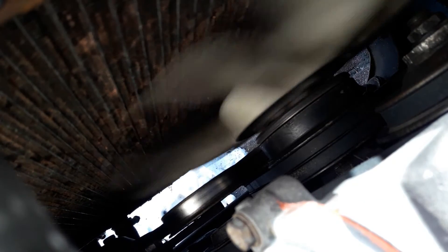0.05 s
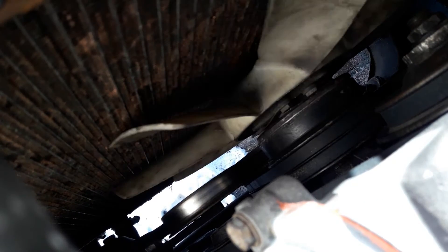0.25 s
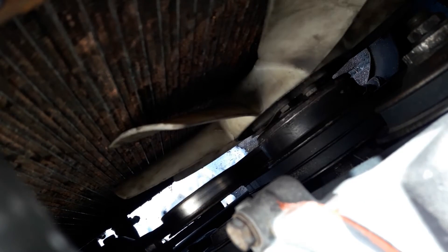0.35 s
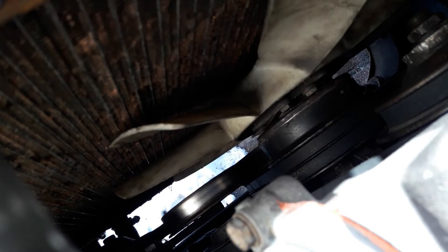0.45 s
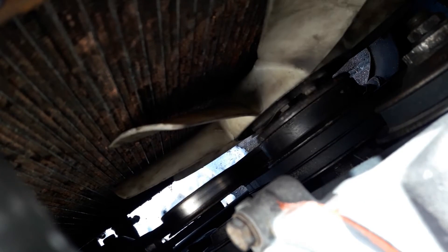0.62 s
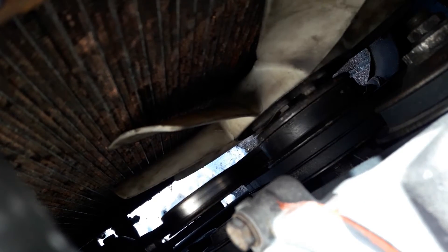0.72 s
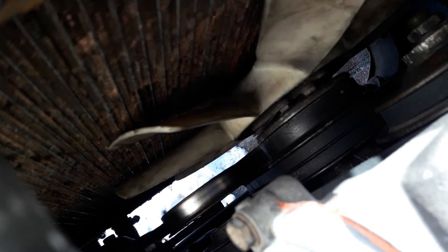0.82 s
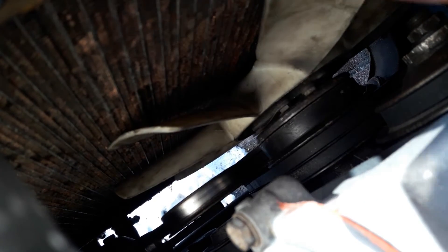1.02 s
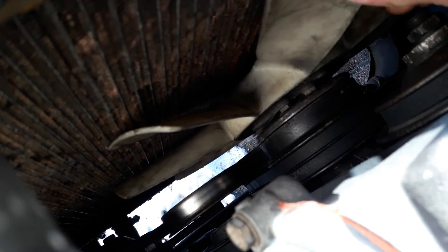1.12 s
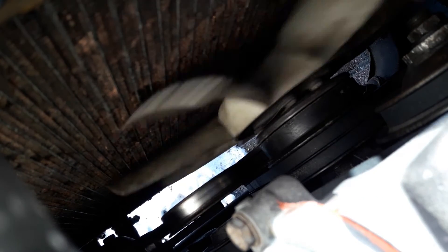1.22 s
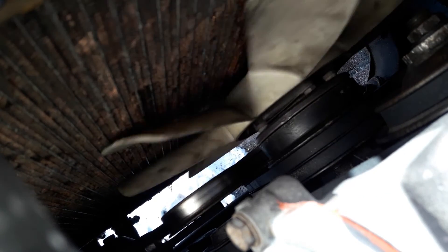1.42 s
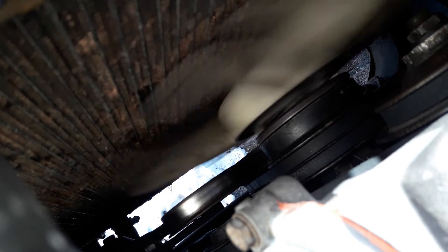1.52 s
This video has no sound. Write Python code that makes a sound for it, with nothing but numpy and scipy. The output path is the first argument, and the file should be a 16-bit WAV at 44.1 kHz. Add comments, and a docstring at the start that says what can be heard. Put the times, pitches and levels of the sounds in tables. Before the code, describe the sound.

Close in a quiet engine bay, faint rubbing ends in one sharp metallic clack as a fan clutch grips. A lighter click and tiny tick follow, then the fan spins up with a soft hiss and slight scrapes.

```python
"""An electromagnetic fan clutch, close up in a quiet engine bay.
The fan coasts with a faint rubbing tone, and the armature plate brushes the pulley.
At 0.22 s the plate snaps on with a sharp metal clack, and the stopped blades shudder.
At 0.6 s it lets go with a small bright click, then settles with a tick.
The fan turns again with a faint hiss, a soft rush and three light scrapes."""
import sys
import numpy as np
from scipy import signal
from scipy.fft import rfft, irfft
from scipy.io import wavfile

SR = 44100
rng = np.random.default_rng(int(sys.argv[2]) if len(sys.argv) > 2 else 0)


def generate_wav(sig):
    """Save sig (samples, or channels by samples) to the path in sys.argv[1] as 16-bit PCM at SR."""
    pcm = np.round(np.clip(np.atleast_2d(sig).T, -1, 1) * 32767).astype(np.int16)
    wavfile.write(sys.argv[1], SR, pcm)


N = 68355
TIME = np.arange(N) / SR
FREQS = np.maximum(np.fft.rfftfreq(N, 1 / SR), 1)
ENGAGE_S, RELEASE_S, SETTLE_S = .2156, .5996, .6583


def from_db(db):
    """Decibels to gain."""
    return 10 ** (np.asarray(db) / 20)

def at_hz(points, hz, column=1):
    """Read a column of a table on a log-frequency axis."""
    table = np.array(points)
    return np.interp(np.log(hz), np.log(table[:, 0]), table[:, column])

def noise_bins(spectrum):
    """Random-phase spectrum with the given density."""
    magnitude = from_db(at_hz(spectrum, FREQS)) * np.sqrt(N * SR / 2)
    return magnitude * np.exp(2j * np.pi * rng.random(len(FREQS)))

def noise(spectrum):
    """Steady noise with the given colour."""
    return irfft(noise_bins(spectrum), N)

def swell(centre_s, width_s):
    """A bell-shaped fade in and out."""
    return np.exp(-.5 * ((TIME - centre_s) / width_s) ** 2)

def drift(rate_hz):
    """Smooth random modulation with spread 1."""
    size = 2048
    lowpass = 1 / (1 + (np.fft.rfftfreq(size, TIME[-1] / size) / rate_hz) ** 4)
    slow = irfft(rfft(rng.standard_normal(size)) * lowpass)
    return np.interp(TIME, np.linspace(0, TIME[-1], size), slow / slow.std())

def blow(start, attack, t60):
    """Impact envelope: rounded attack, exponential decay."""
    out = np.zeros(N)
    live = (TIME > start) & (TIME < start + 2 * t60)
    age = TIME[live] - start
    out[live] = np.sin(np.pi / 2 * np.minimum(age / attack, 1)) ** 2 * from_db(-60 * age / t60)
    return out

def dense_ring(start, spectrum, ring):
    """Crowded metal modes: each third octave swells and dies at its own rate, then lingers in the bay."""
    bins, out = noise_bins(spectrum), np.zeros(N)
    edges = np.geomspace(140, 18000, 22)
    bay_reverb = blow(start, attack=.012, t60=.21)
    for low, high in zip(edges, edges[1:]):
        hz = np.sqrt(low * high)
        attack, t60, reverb_db = (at_hz(ring, hz, column) for column in (1, 2, 3))
        band = irfft(bins * (FREQS >= low) * (FREQS < high), N)
        envelope = np.hypot(blow(start, attack, t60), from_db(reverb_db) * bay_reverb)
        hit = band * envelope
        # hold the band's energy steady however the noise falls
        out += hit * band.std() * np.sqrt(np.sum(envelope ** 2) / np.sum(hit ** 2))
    return out

def clear_ring(start, modes):
    """Distinct metal modes, each beating unevenly against close neighbours."""
    out = np.zeros(N)
    for hz, db, t60 in modes:
        tone = np.sin(2 * np.pi * (hz * TIME + rng.random()))
        beating = 1 + .25 * drift(rate_hz=70)
        attack = min(11 / hz, .009)   # the blow spreads through the metal in 11 cycles, 9 ms at most
        out += from_db(db) * blow(start, attack, t60) * tone * beating
    return out


# dark background bed: f/Hz, level/dB per Hz
BED = [(20, -115), (40, -103), (60, -92.5), (110, -92.5), (200, -101), (400, -107), (1000, -109),
       (2000, -113), (4000, -117), (8000, -121), (15500, -124)]
def engine_bay():
    """Low, steady ambience under the whole scene."""
    return noise(BED)

# low hum with a thin tone near 1.5 kHz: f/Hz, level/dB per Hz
RUB = [(40, -105), (80, -91), (122, -77), (190, -86), (270, -88), (400, -103), (1000, -104), (1400, -100),
       (1470, -87), (1515, -80), (1570, -83), (1620, -92), (1720, -102), (1920, -97), (2300, -110),
       (4200, -117), (6500, -123), (10000, -120), (15000, -135)]
def plate_rub():
    """The plate rubs while the fan coasts, fading in 20 ms once the clutch grips."""
    coasting = np.clip((ENGAGE_S - TIME) / .02 + 1, 0, 1)
    return coasting * noise(RUB)

# airy whisper: f/Hz, level/dB per Hz
BRUSH = [(2000, -125), (3400, -113), (4200, -108), (5200, -113), (6500, -126), (12000, -140)]
def plate_brush():
    """The plate brushes the pulley just before it grips."""
    return swell(centre_s=.128, width_s=.032) * noise(BRUSH)

# the clack's body of crowded modes: f/Hz, level/dB per Hz
CLACK_BODY = [(150, -74), (280, -69), (400, -78), (520, -64), (800, -61), (1050, -62), (1550, -56),
              (2100, -56), (2370, -64), (2700, -52.5), (3250, -56), (3650, -60), (3950, -55), (4280, -60),
              (4500, -49.5), (6600, -52), (7100, -63), (8400, -53.5), (9050, -67), (9500, -47.5),
              (10500, -50.5), (11000, -62.5), (12700, -60), (13800, -69), (15700, -68)]
# its envelope: f/Hz, attack/s, t60/s, reverb/dB
CLACK_ENVELOPE = [(300, 0.0046, .22, -18), (694, 0.0062, .13, -17), (1600, .005, .09, -13),
                  (3000.4, .0017, .062, -22), (5500, .0016, .061, -27), (10100, .0005, .053, -31),
                  (15000, .0007, .044, -32)]
# its pitched ring: f/Hz, level/dB, t60/s
CLACK_MODES = [(526.6, -32.5, .115), (630, -33, .15), (724, -27, .125), (1000, -42, .15), (1265, -34, .115),
               (1440, -31.5, .095), (1523, -18.5, .086), (1585, -28, .09), (1786, -31, .11),
               (1936, -29, .1), (2076, -13, .074), (2183, -24, .085), (2716, -18.5, .06), (2890, -27, .064),
               (3170, -26, .055), (3950, -26, .05), (4452, -22, .055), (4944, -22.5, .063),
               (5146, -22.5, .053), (6300, -27, .055), (6700, -26, .058), (9826, -22, .05),
               (9973, -23, .052), (10160, -22, .05), (10600, -23.5, .045)]
def engage_clack():
    """The armature plate slams onto the pulley and shifts once more."""
    clack = dense_ring(ENGAGE_S, CLACK_BODY, CLACK_ENVELOPE) + clear_ring(ENGAGE_S, CLACK_MODES)
    rebound = from_db(-44) * dense_ring(ENGAGE_S + .0675, CLACK_BODY, CLACK_ENVELOPE)
    return clack + rebound

# low throbs of the blades: t/s, level/dB
THROBS = [(.255, -50), (.303, -49), (.355, -48.5), (.398, -50), (.445, -58), (.525, -59)]
# the grit on each throb: f/Hz, relative level/dB per Hz
RATTLE = [(30, -40), (80, -30), (170, -22), (270, -24), (400, -45), (1000, -45), (3000, -65)]
def blade_shudder(mode_hz=170):
    """The blades rock after the sudden stop; each throb sounds their low mode with a slight rattle."""
    rattle = .15 * noise(RATTLE)
    out = np.zeros(N)
    for centre_s, db in THROBS:
        tone = np.sin(2 * np.pi * (mode_hz * TIME + rng.random()))
        out += from_db(db) * swell(centre_s, width_s=.011) * (tone + rattle)
    return out

# the click's bright body: f/Hz, level/dB per Hz
CLICK_BODY = [(200, -92), (600, -82), (1000, -79), (1600, -74.5), (2100, -76), (2600, -93), (3400, -77),
              (3750, -72), (4300, -79), (5600, -92), (7000, -85), (7600, -79), (9100, -82), (9850, -55),
              (10300, -56), (10800, -68), (11500, -80), (12300, -112), (13000, -135)]
# its envelope: f/Hz, attack/s, t60/s, reverb/dB
CLICK_ENVELOPE = [(300, 0.0027, .21, -20), (1510, .0008, .072, -18), (3830, 0.0013, .05, -19),
                  (7500, .0005, .04, -23), (10000, .0006, .026, -35)]
# its pitched ring: f/Hz, level/dB, t60/s
CLICK_MODES = [(614, -57, .17), (1529, -54, .08), (3700, -39, .043), (4000, -48, .055), (10300, -28, .032)]
def release_click():
    """The plate peels off and, 2 ms later, springs against its stop."""
    peel = from_db(-12) * dense_ring(RELEASE_S - .002, CLICK_BODY, CLICK_ENVELOPE)
    click = dense_ring(RELEASE_S, CLICK_BODY, CLICK_ENVELOPE) + clear_ring(RELEASE_S, CLICK_MODES)
    return peel + click

# the tick's thin body: f/Hz, level/dB per Hz
TICK_BODY = [(500, -108), (1800, -91), (3000, -104), (4000, -99), (6300, -104), (9000, -83.5),
             (10400, -81.5), (12000, -100), (14000, -116)]
# its envelope: f/Hz, attack/s, t60/s, reverb/dB
TICK_ENVELOPE = [(500, .001, 0.1, -8), (4000, .001, .045, -12), (10000, 0.0011, .032, -24)]
def settle_tick():
    """The freed plate settles with one tiny tap."""
    return dense_ring(SETTLE_S, TICK_BODY, TICK_ENVELOPE)

# high sizzle, with the fader at 0 dB: f/Hz, level/dB per Hz
HISS = [(5000, -128), (7700, -122), (8700, -111), (9100, -103), (9800, -100.5), (10800, -105.5),
        (12000, -123), (15000, -135)]
# darker layer on the same fader: f/Hz, level/dB per Hz
DARK_HISS = [(6500, -135), (7800, -117), (8800, -105), (9500, -114), (10500, -135)]
# fader ride: t/s, level/dB
HISS_FADER = [(.75, -35.5), (.9, -17), (1.02, -6), (1.08, -8), (1.14, -1), (1.22, 0), (1.28, -2),
              (1.34, 0.5), (1.45, -4.5), (1.55, -12)]
def fan_hiss(flutter_db=1.8):
    """The turning fan's fluttering hiss darkens for a moment as it gathers speed."""
    fader = from_db(np.interp(TIME, *np.transpose(HISS_FADER)))
    flutter = from_db(flutter_db * drift(rate_hz=30))
    darkening = swell(centre_s=1.22, width_s=.04) * noise(DARK_HISS)
    return fader * flutter * (noise(HISS) + darkening)

# soft wash at full speed: f/Hz, level/dB per Hz
RUSH = [(100, -103), (400, -107), (900, -107), (2000, -115), (5000, -121), (9000, -128)]
def fan_rush(from_s=.87, full_s=1.295):
    """The rush of blades and bearing fades in as the fan spins up."""
    speed = np.clip((TIME - from_s) / (full_s - from_s), 0, 1)
    return speed * noise(RUSH)

# dull scrape colour: f/Hz, level/dB per Hz
SCRAPE = [(100, -98), (400, -103), (1500, -106), (3000, -110), (6000, -115), (12000, -130)]
# scrape cues: t/s, relative level/dB
SCRAPE_CUES = [(1.13, -2), (1.32, -4), (1.445, -2)]
def plate_scrapes():
    """The turning plate scrapes faintly, three times."""
    envelope = sum(from_db(db) * swell(centre_s, width_s=.008) for centre_s, db in SCRAPE_CUES)
    return envelope * noise(SCRAPE)


def scene():
    """Coast, grip, release and spin-up over the ambience, in mono."""
    mix = engine_bay() + plate_rub() + plate_brush()
    mix += engage_clack() + blade_shudder()
    mix += release_click() + settle_tick()
    mix += fan_hiss() + fan_rush() + plate_scrapes()
    return mix[None]

def record(dry, cutoff_hz=15900):
    """A steep high cut on the mix."""
    return signal.sosfilt(signal.ellip(12, .1, 80, cutoff_hz, fs=SR, output="sos"), dry)


dry = scene()
out = record(dry)
generate_wav(out)
```